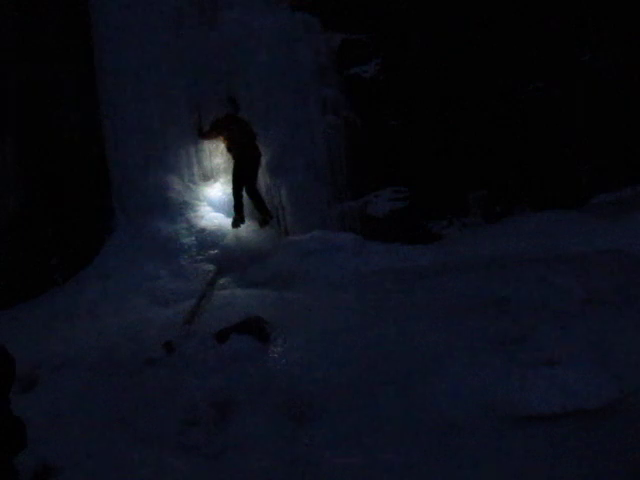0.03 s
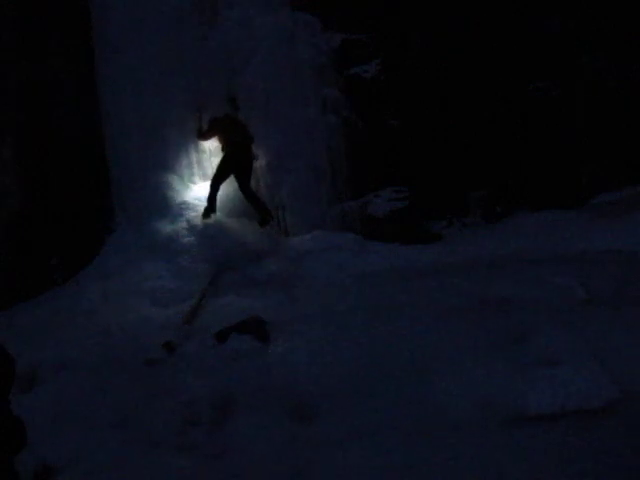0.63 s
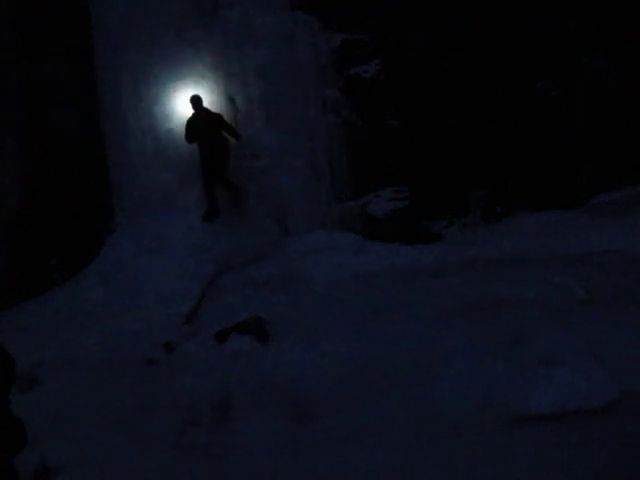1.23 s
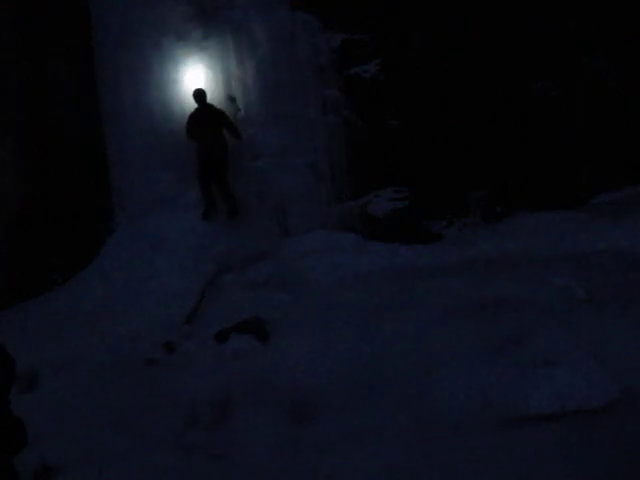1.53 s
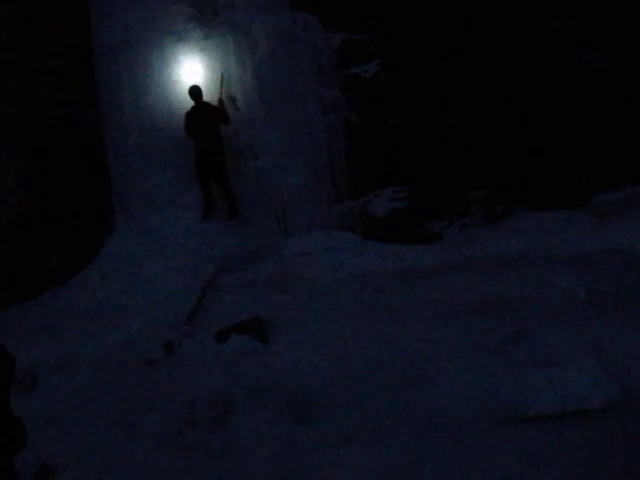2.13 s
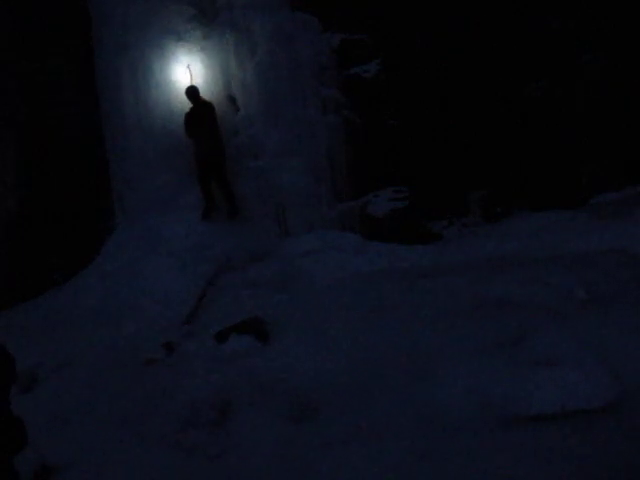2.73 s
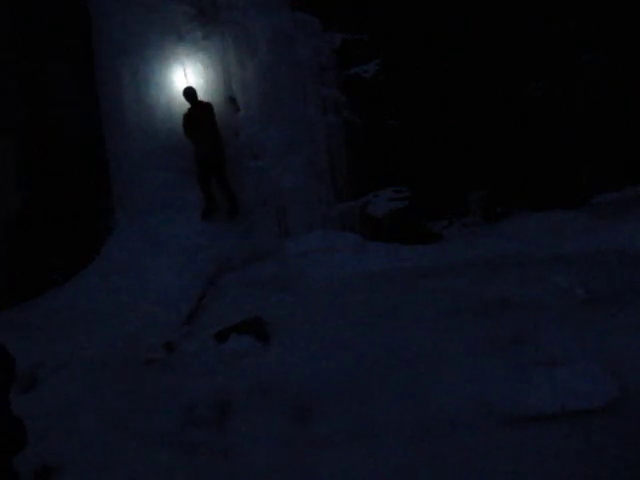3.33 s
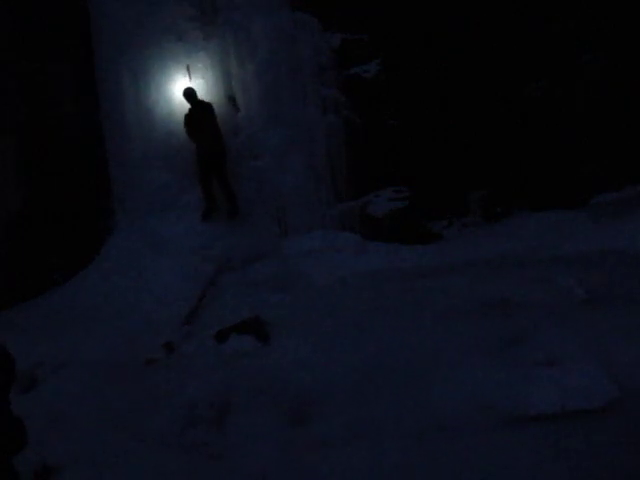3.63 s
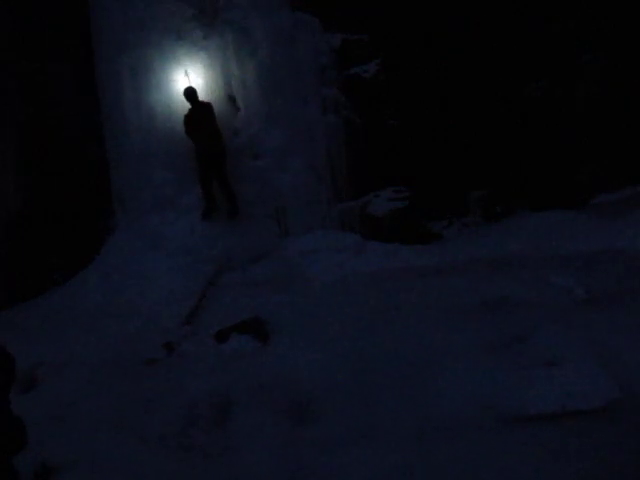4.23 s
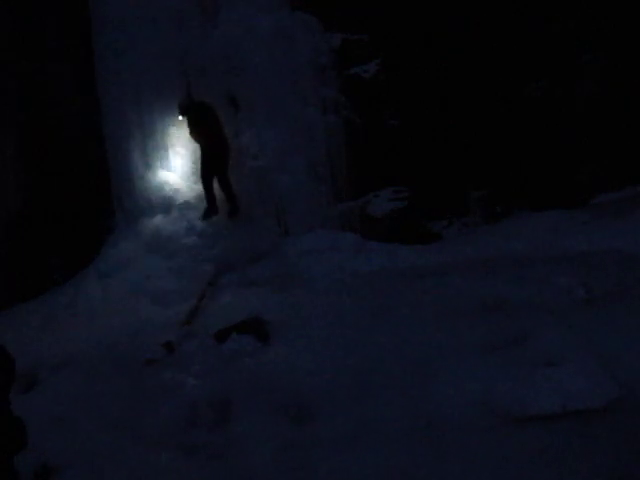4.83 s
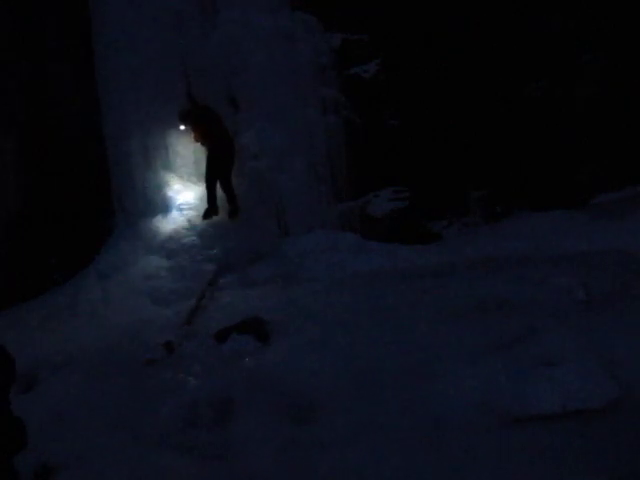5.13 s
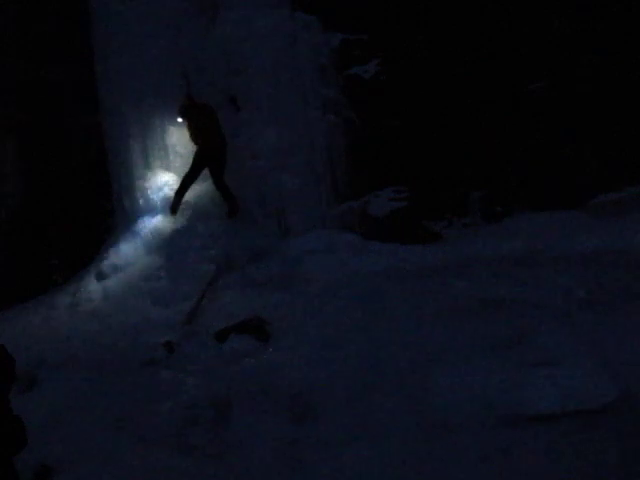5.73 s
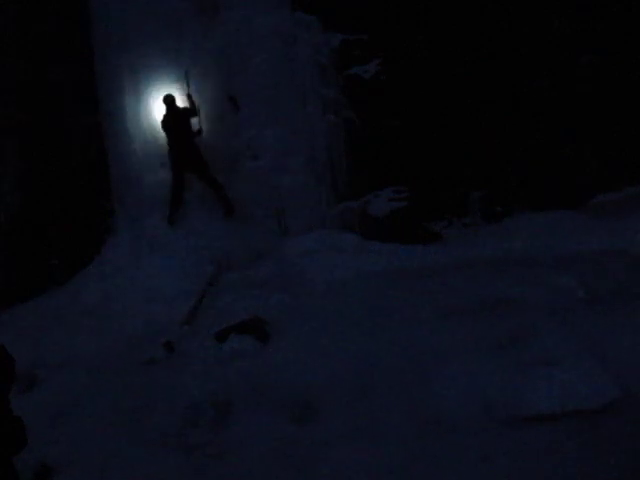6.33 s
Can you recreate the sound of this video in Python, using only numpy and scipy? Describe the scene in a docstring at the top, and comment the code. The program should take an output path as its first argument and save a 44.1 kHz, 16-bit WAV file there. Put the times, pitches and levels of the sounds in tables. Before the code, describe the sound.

A climber's sharp axe blows and crunching boot kicks hit ice at irregular intervals, with small chips ticking down outdoors.

```python
"""A frozen waterfall at night, with a climber working up it some way off.
Steel picks crack into the ice and clang, crampons kick and scrape, and loosened chips tick down the
column. Each blow is a burst of tiny fractures that sets the ice ringing; trees and rock scatter it back.
Meltwater gurgles and drips faintly behind the ice, over a bed of low air and fine hiss."""
import sys
import numpy as np
from scipy import signal
from scipy.fft import rfft, irfft, next_fast_len
from scipy.io import wavfile
from scipy.ndimage import uniform_filter1d, map_coordinates

SR = 44100
rng = np.random.default_rng(int(sys.argv[2]) if len(sys.argv) > 2 else 0)


def store_pcm(level_fs):
    """Save levels as 16-bit WAV."""
    pcm = np.round(np.clip(level_fs, -1, 1) * 32767).astype(np.int16)
    wavfile.write(sys.argv[1], SR, np.atleast_2d(pcm).T)


N = 282240

# Tone curves for the night air, skidding steel, crampon crunch, boot knock and pick bite.
# Each row: frequency in Hz, relative level in dB.
AIR_EQ = [(12, 1), (20, 3.5), (146, -17.5), (198, -15.5), (241, -8.5), (347, -13.5), (485, -20.5),
          (527, -18), (897, -26.5), (1290, -24), (2200, -35.5), (2820, -34), (3630, -36.5), (10200, -35.5),
          (16000, -50.5)]
SCRAPE_EQ = [(60, -8), (120, 13), (300, -20), (900, 1), (1700, -1.5), (2700, 0), (5000, -0.5), (8500, 1.5),
             (10500, -1.5), (13000, -17), (16000, -24)]
CRUNCH_EQ = [(300, -31), (1200, -12.5), (2700, -3.5), (4500, -6), (7000, -6.5), (9000, -1.5), (11000, -8.5),
             (13000, -14), (16000, -36)]
KNOCK_EQ = [(70, -13), (200, 2.5), (340, -1.5), (560, 0.5), (850, -3.5), (1200, -7), (1700, -12.5),
            (4000, -40), (9000, -46)]
BITE_EQ = [(60, -33), (250, 1.5), (700, -2.5), (1100, -2), (1500, -1), (2600, 1.5), (3400, -1), (3870, 2),
           (4400, 0.5), (5400, 2), (6700, -3.5), (8600, 4), (10300, -0.5), (12000, -12), (16000, -28)]
# Near drips. Each row: start in seconds, level in dB before trim, pitch in Hz before detuning.
NEAR_DRIPS = [(2.071, -45, 3900), (3.007, -46, 2990), (3.148, -39.5, 2590), (5.223, -48.5, 2830),
              (5.372, -41, 4670), (5.4306, -34, 10360), (5.678, -40.5, 10600)]
# Hollow glugs behind the ice. Each row: start in seconds, level in dB before trim.
HOLLOW_GLUGS = [(1.12, -40.5), (2.012, -37), (3.589, -49), (5.265, -40.5)]
# Steel dragged over ice. Each row: start in seconds, stroke length in seconds, level in dB.
SCRAPE_STROKES = [(0.232, 0.011, -46), (0.836, 0.0074, -29.5), (.859, 0.026, -31.5), (1.772, 0.072, -51),
                  (2.322, 0.026, -57.5), (2.74, .004, -43.5), (6.315, 0.014, -46.5), (6.346, 0.0031, -43)]
# Falling chips. Each row: start in seconds, level in dB, pitch in Hz, click in dB against the ring.
FALLING_CHIPS = [(.3615, -46, 8460, 4.5), (0.5118, -46.5, 1680, 1.5), (0.7906, -31, 2800, -18),
                 (0.8021, -29, 2800, -12), (1.1348, -43.5, 9300, -12), (1.4827, -39, 2900, -3),
                 (1.909, -46, 3500, 12), (2.164, -45.5, 4070, 7.5), (2.2618, -45, 2870, 6),
                 (2.585, -32, 8900, -22), (3.652, -46.5, 3830, 6.5), (3.737, -38.5, 8000, -12),
                 (5.06, -47.5, 5850, 1.5), (5.602, -34.5, 10000, -22), (6.349, -40.5, 3000, -4)]
# Decay of the near echo. Each row: frequency in Hz, t60 in seconds.
ECHO_DECAY = [(80, 0.84), (400, 0.28), (1500, 0.36), (4000, 0.23), (9000, 0.25), (15000, 0.42)]
# Crampon kicks. Each row: start in seconds, delay until the points seat in seconds, crunch in dB,
# seating in dB against the crunch, seated knock in dB, thump in dB, pitch of the hollow in Hz.
CRAMPON_KICKS = [(0.6503, 0.0039, -26.5, -3, -24, -26, 1126), (1.323, 0.0092, -22, 5.5, -26, -20, 1344),
                 (5.8458, .0075, -28, 5.5, -29.5, -55, 832), (5.8644, 0.0044, -32.5, 6, -29, -27, 750)]
# Light boot taps. Each row: start in seconds, knock in dB, crunch in dB against the knock,
# pitch of the hollow in Hz.
BOOT_TAPS = [(0.7608, -32.5, -9, 590), (0.7903, -36.5, -12, 625), (0.8036, -38, -10, 636),
             (.872, -43, -2, 105), (1.026, -44, -3, 420), (1.348, -33.5, 5, 432), (2.768, -43.5, -7, 1494),
             (5.919, -41.5, -7, 231)]
# Modes of the struck ice. Each row: pitch in Hz, relative level in dB, t60 in seconds.
ICE_MODES = [(720, -15.5, 0.068), (2060, -19, 0.0029), (2635, -7.5, 0.019), (3260, -13.5, 0.0087),
             (5620, -14, 0.027)]
# Pick swings. Each row: start in seconds, delay until the point seats in seconds, bite in dB, seating
# and clang in dB against the bite, ting in dB, knock in dB against the bite, pitch of the hollow in Hz.
PICK_SWINGS = [(2.630, 0.0069, -24.5, 5, -9, -51, -8, 1456),
               (3.2882, 0.0046, -14.5, -9, -2, -47.5, -13, 753),
               (4.2302, .0045, -16.5, 2, 2.5, -50, -13, 1462)]
# The pick's head, damped fast by the ice that grips it.
# Each row: pitch in Hz, level in dB against the clang, t60 in seconds.
CLANG_MODES = [(3784, 2.5, 0.019), (8520, -3.5, 0.028), (8500, -30, 0.028)]
# The tool's faint after-ring, in clusters of close modes.
# Each row: centre in Hz, width in Hz, level in dB against the ting, t60 in seconds.
TING_CLUSTERS = [(1530, 160, -5, 0.43), (3100, 140, -9, .6), (3910, 130, -9, .4), (8530, 250, 4, 0.46)]

TOP_HZ = 15900
PICK_RISE_S, PICK_T60_S = 0.00091, 0.032
KICK_RISE_S, KICK_T60_S = 0.0016, 0.037
TAP_RISE_S, TAP_T60_S = 0.00064, 0.022


def amp(db):
    """Decibels to gain."""
    return 10 ** (np.asarray(db) / 20)


def unit(x):
    """Scale to rms 1."""
    return x / np.sqrt(np.mean(x ** 2) + 1e-20)


def along(points, hz):
    """Read a curve of (Hz, value) points on a log frequency axis."""
    freqs, values = np.transpose(points)
    return np.interp(np.log(hz + 1), np.log(freqs + 1), values)


def add(track, s, sound):
    """Mix a sound into the track at s seconds."""
    start = max(0, round(s * SR))
    part = sound[:max(0, N - start)]
    track[start:start + len(part)] += part


def wobble(rate):
    """A smooth random curve, rate knots a second."""
    return map_coordinates(rng.standard_normal(int(N * rate / SR) + 4), [np.arange(N) * rate / SR])


def swell(t, rise, t60, hold=0):
    """An envelope that rises, holds, then falls 60 dB every t60 seconds."""
    return np.clip(t / max(rise, 1e-4), 0, 1) * amp(-60 * np.maximum(t - rise - hold, 0) / t60)


def coloured(x, curve, size=8192):
    """A unit-energy EQ, minimum phase so that nothing rings ahead of an attack."""
    cepstrum = irfft(np.log(amp(along(curve, np.fft.rfftfreq(size, 1 / SR)))))
    cepstrum[1:size // 2] *= 2
    cepstrum[size // 2 + 1:] = 0
    response = irfft(np.exp(rfft(cepstrum)))
    return signal.fftconvolve(x, response / np.linalg.norm(response))[:N]


def night(level_db=-48, drift_db=0.9):
    """The bed: low air and fine hiss, wavering slightly in level."""
    return amp(level_db + drift_db * wobble(11)) * unit(coloured(rng.standard_normal(N), AIR_EQ))


def bubble(hz, cycles, glide, rough):
    """A trapped air pocket rings and rises in pitch; splashing roughens it."""
    life = cycles / hz
    t = np.arange(int(life * SR) + 64) / SR
    tone = np.exp(2j * np.pi * hz * np.cumsum(1 + glide * t / life) / SR)
    splash = unit(uniform_filter1d(rng.standard_normal((2, len(t))), int(4 * SR / hz), axis=1))
    roughened = tone.real * (1 + rough * splash[0]) + tone.imag * rough * splash[1]
    return roughened / np.hypot(1, rough) * swell(t, life / 10, life)


def meltwater(drip_trim_db=-4, drip_detune=0.943, glug_trim_db=1, babbles=240, gurgles=120):
    """Drips plink; a trickle babbles and gurgles in hollows behind the ice."""
    out = np.zeros(N)
    for s, db, hz in NEAR_DRIPS:
        drip = bubble(hz * drip_detune, cycles=130, glide=0.225, rough=0.74)
        add(out, s, amp(db + drip_trim_db) * drip)
    for s, db in HOLLOW_GLUGS:
        add(out, s, amp(db + glug_trim_db) * bubble(hz=256, cycles=22.4, glide=0.027, rough=0.76))
    for when, pitch, strength in rng.random((babbles, 3)):
        babble = bubble(900 + 600 * pitch, cycles=36, glide=0.15, rough=1)
        add(out, when * N / SR, amp(-59 + 6 * strength ** 3) * babble)
    for when, pitch, strength in rng.random((gurgles, 3)):
        gurgle = bubble(225 + 125 * pitch ** 2, cycles=32, glide=0.23, rough=0.55)
        add(out, when * N / SR, amp(-54 + 8.8 * strength ** 2) * gurgle)
    return out


def dust(grain_db=5, patchy_db=4, trickle_db=-66, sift_db=-26):
    """A little ice dust trickles all the time; more sifts down after every scrape."""
    flow, t = np.full(N, amp(trickle_db)), np.arange(2 * SR) / SR
    for s, _, db in SCRAPE_STROKES:
        add(flow, s, amp(db + sift_db) * swell(t, rise=0.049, t60=0.66))
    grains = rng.standard_normal(N) * amp(grain_db * wobble(500) + patchy_db * wobble(25))
    return flow * unit(coloured(grains, CRUNCH_EQ))


def fracture(rise, t60, spiky_db, smooth_hz=260, hold=0):
    """A burst of tiny cracks of uneven strength, flattened to an even colour."""
    t = np.arange(next_fast_len(int((rise + hold + t60) * SR) + 256)) / SR
    strength = amp(spiky_db * unit(uniform_filter1d(rng.standard_normal(len(t)), size=16)))
    envelope = swell(t, rise, t60, hold)
    spectrum = rfft(strength * rng.standard_normal(len(t)) * envelope, 2 * len(t))
    smooth_bins = max(1, int(smooth_hz * 2 * t[-1]))
    power = np.abs(uniform_filter1d(np.abs(spectrum) ** 2, smooth_bins))
    return irfft(spectrum / np.sqrt(power + 1e-20))[:len(t)] * np.linalg.norm(envelope)


def scrapes(rise=0.003, t60=0.075, crumb_db=-2, crumb_count=9):
    """Points skid and shave the surface in quick catches, breaking off crumbs as they go."""
    shavings, crumbs = np.zeros(N), np.zeros(N)
    for s, length, db in SCRAPE_STROKES:
        add(shavings, s, amp(db) * fracture(rise, t60, spiky_db=3.5, smooth_hz=1500, hold=length))
        for when, size in rng.random((crumb_count, 2)):
            delay = rise + when * (length + t60 / 4)
            crumb = chip(9500 * 0.172 ** size, click_db=-22)
            add(crumbs, s + delay, amp(db + crumb_db - 10 * when) * crumb)
    catches = amp(2.2 * wobble(350))
    return coloured(shavings * catches, SCRAPE_EQ) + crumbs


def chip(hz, click_db, min_q=4.7):
    """A bit of ice lands with a click and a short ring; small ones ring higher and die sooner."""
    hit = fracture(rise=0.00096, t60=0.017 * (3000 / hz) ** 0.29, spiky_db=1)
    body = signal.iirpeak(min(hz, TOP_HZ), max(min_q, hz / 2200), SR)
    ring = signal.lfilter(*body, signal.lfilter(*body, hit))
    click = signal.lfilter(*signal.butter(3, [2200, 10800], "band", fs=SR), hit)
    return (unit(ring) + amp(click_db) * unit(click)) * np.std(hit)


def chips(splinter_count=3, splinter_db=-10, scatter_s=0.012, crumb_count=300):
    """Single chips splinter as they land, over a fine fall of crumbs, mostly small and bright."""
    out = np.zeros(N)
    for s, db, hz, click_db in FALLING_CHIPS:
        add(out, s, amp(db) * chip(hz, click_db))
        for when, pitch in rng.random((splinter_count, 2)):
            splinter = chip(hz * 2 ** (pitch - 0.5), click_db)
            add(out, s + when * scatter_s, amp(db + splinter_db - 10 * when) * splinter)
    for when, size, strength in rng.random((crumb_count, 3)):
        crumb = chip(10500 - 8000 * size ** 2, click_db=-5)
        add(out, when * N / SR, amp(-59 + 12 * strength ** 4) * crumb)
    return out


def forest_echo(send, near_db=-11, far_db=-22, onset_s=0.033, reach_s=0.45):
    """Trunks and rock scatter sound back: a grainy near echo and a faint one from the trees beyond."""
    hz, frame_s, noise = signal.stft(rng.standard_normal(SR), SR, nperseg=256)
    decay = amp(-60 * frame_s / along(ECHO_DECAY, hz)[:, None])
    near = signal.istft(noise * decay, SR, nperseg=256)[1][:SR]
    t = np.arange(SR) / SR
    trunks = amp(2.4 * unit(uniform_filter1d(rng.standard_normal(SR), size=200)))
    near *= trunks * np.minimum(t / onset_s, 1)
    far = signal.lfilter(*signal.butter(1, 5500, fs=SR), rng.standard_normal(SR))
    far *= trunks * np.minimum(t / 0.0067, 1)
    far *= np.maximum(1 - t / reach_s, 0)  # ends with the farthest trees
    tail = amp(near_db) * near / np.linalg.norm(near) + amp(far_db) * far / np.linalg.norm(far)
    return signal.fftconvolve(send, tail)[:N]


def boot_contacts():
    """A kick touches, then seats; a tap only touches.
    Each row: start, rise and t60 in seconds, crunch and knock in dB, pitch of the hollow in Hz."""
    touches, seats, taps = [], [], []
    for s, delay, crunch_db, seat_db, knock_db, _, hz in CRAMPON_KICKS:
        touches.append((s, KICK_RISE_S, KICK_T60_S, crunch_db, knock_db - 4.5, hz))
        seats.append((s + delay, KICK_RISE_S, KICK_T60_S, crunch_db + seat_db, knock_db, hz))
    for s, knock_db, crunch_db, hz in BOOT_TAPS:
        taps.append((s, TAP_RISE_S, TAP_T60_S, knock_db + crunch_db, knock_db, hz))
    return touches + seats + taps


def kicks(knock_lag_s=0.0011):
    """Crampon points crunch in, and the boot's knock peaks just after."""
    crunch, knock = np.zeros(N), np.zeros(N)
    for s, rise, t60, crunch_db, knock_db, _ in boot_contacts():
        add(crunch, s, amp(crunch_db) * fracture(rise, t60, spiky_db=5.5))
        add(knock, s, amp(knock_db) * fracture(rise + knock_lag_s, t60=0.054, spiky_db=3))
    return coloured(crunch, CRUNCH_EQ) + coloured(knock, KNOCK_EQ)


def ringing(modes, rise):
    """Damped modes, at new strengths and phases for every blow."""
    out, t = np.zeros(SR // 2), np.arange(SR // 2) / SR
    for hz, db, t60 in modes:
        gain = amp(db + rng.normal(0, 1))
        out += gain * np.sin(2 * np.pi * (hz * t + rng.random())) * swell(t, rise, t60)
    return out


def hollow(hz, db=-2, t60=0.045):
    """A hollow under the point answers with one short note."""
    return ringing([(hz, db, t60)], rise=0.0042)


def ice_column(boot_db=2, thump_hz=66, tap_thump_db=-16):
    """The ice and a hollow ring at every blow; a boot also thumps the whole column."""
    out, t = np.zeros(N), np.arange(SR // 2) / SR
    thump = np.sin(2 * np.pi * thump_hz * t) * swell(t, rise=0.0065, t60=0.037)
    for s, _, db, *_, knock_db, hz in PICK_SWINGS:
        add(out, s, amp(db) * (ringing(ICE_MODES, PICK_RISE_S) + amp(knock_db) * hollow(hz)))
    for s, rise, _, crunch_db, knock_db, hz in boot_contacts():
        add(out, s, amp(crunch_db + boot_db) * ringing(ICE_MODES, rise) + amp(knock_db) * hollow(hz))
    for s, delay, *_, thump_db, _ in CRAMPON_KICKS:
        add(out, s + delay, amp(thump_db) * thump)
    for s, knock_db, *_ in BOOT_TAPS:
        add(out, s, amp(knock_db + tap_thump_db) * thump)
    return out


def shimmer(hz, width_hz, rise, t60):
    """Close steel modes beat as they fade, voiced as a narrow band of noise."""
    band = signal.iirpeak(min(hz, TOP_HZ), hz / width_hz, SR)
    beats = signal.lfilter(*band, signal.lfilter(*band, rng.standard_normal(SR)))
    return unit(beats) * swell(np.arange(SR) / SR, rise, t60)


def harness_ting(start_s=1.02, db=-60):
    """A small steel piece on the harness tings once."""
    out = np.zeros(N)
    add(out, start_s, amp(db) * shimmer(hz=11500, width_hz=240, rise=0.034, t60=1.1))
    return out


def pick_bites():
    """The pick shatters the ice around its point, and again as the point seats."""
    cracks = np.zeros(N)
    for s, delay, db, seat_db, *_ in PICK_SWINGS:
        for when, level_db in (s, db), (s + delay, db + seat_db):
            crack = fracture(PICK_RISE_S, PICK_T60_S, spiky_db=0, smooth_hz=380)
            add(cracks, when, amp(level_db) * crack)
    return coloured(cracks, BITE_EQ)


def pick_steel():
    """The pick clangs as it goes in and goes on singing faintly."""
    out = np.zeros(N)
    for s, _, db, _, clang_db, ting_db, *_ in PICK_SWINGS:
        add(out, s, amp(db + clang_db) * ringing(CLANG_MODES, PICK_RISE_S))
        for hz, width_hz, cluster_db, t60 in TING_CLUSTERS:
            add(out, s, amp(ting_db + cluster_db) * shimmer(hz, width_hz, rise=0.005, t60=t60))
    return out


def scene():
    """The climb and its echo over the quiet night; the sharp cracks feed the echo most."""
    cracks = pick_bites() + kicks() + scrapes() + chips()
    rings = ice_column() + pick_steel() + harness_ting()
    echo = forest_echo(cracks + amp(-10) * rings)
    return (cracks + rings + echo + dust() + meltwater() + night())[None]


def record(dry):
    """A brick-wall low-pass takes off the very top."""
    size = next_fast_len(N + SR // 2)
    passband = np.fft.rfftfreq(size, 1 / SR) < TOP_HZ
    return irfft(rfft(dry, size) * passband, size)[..., :N]


dry = scene()
out = record(dry)
store_pcm(out)
```